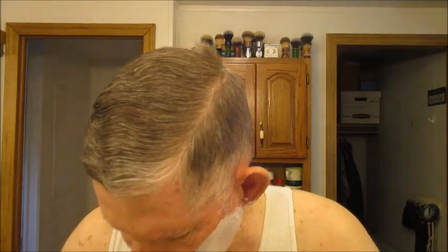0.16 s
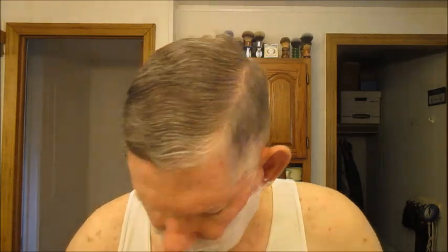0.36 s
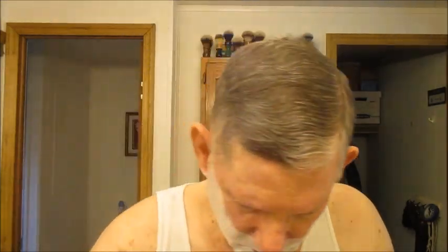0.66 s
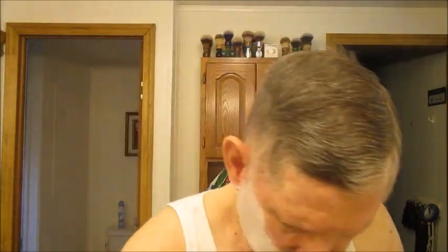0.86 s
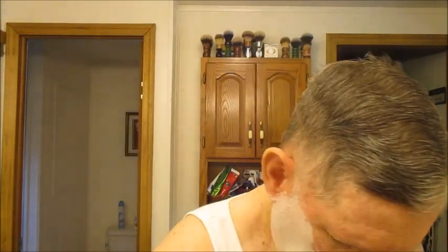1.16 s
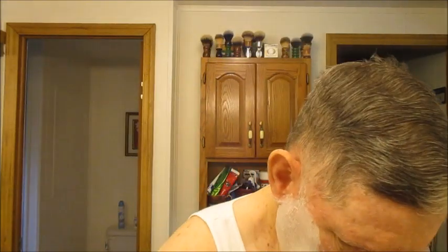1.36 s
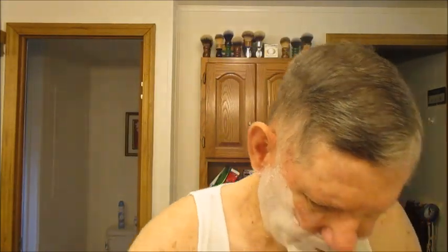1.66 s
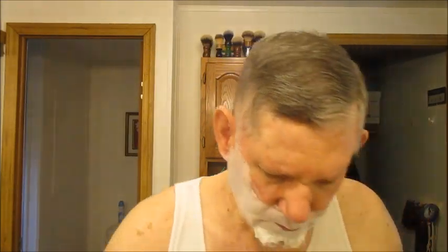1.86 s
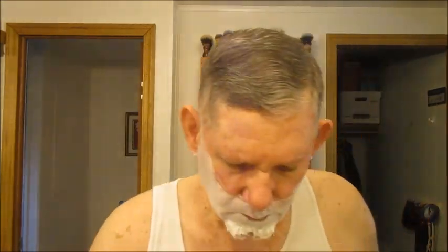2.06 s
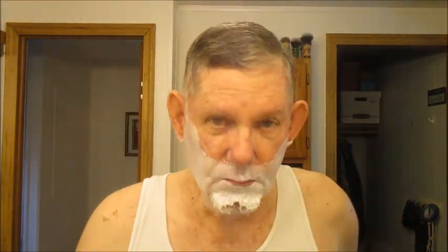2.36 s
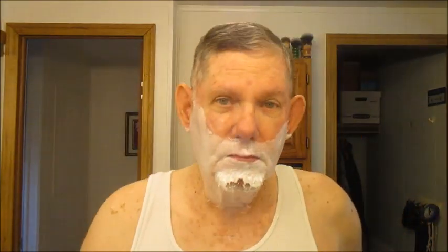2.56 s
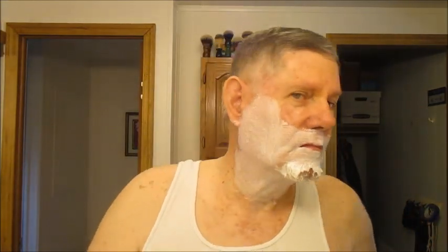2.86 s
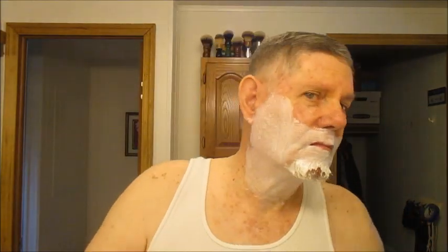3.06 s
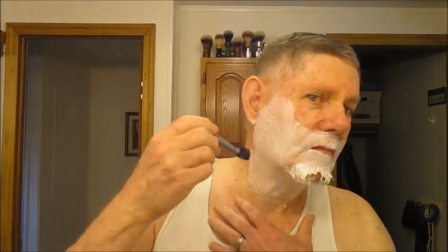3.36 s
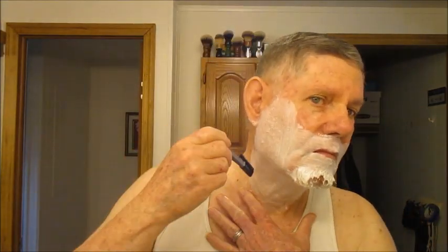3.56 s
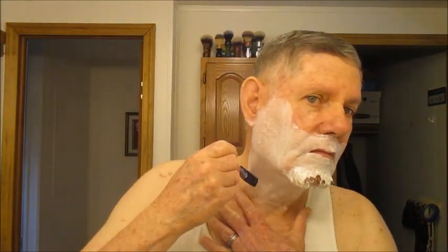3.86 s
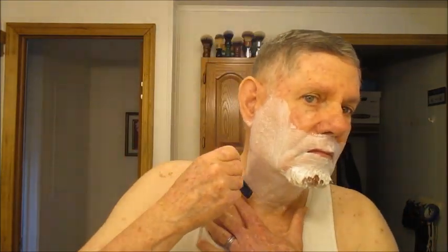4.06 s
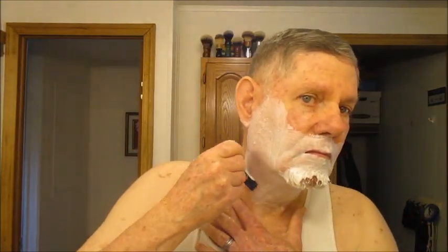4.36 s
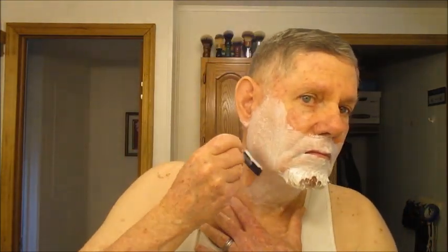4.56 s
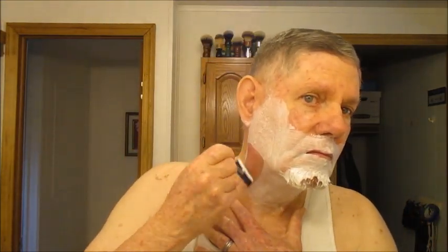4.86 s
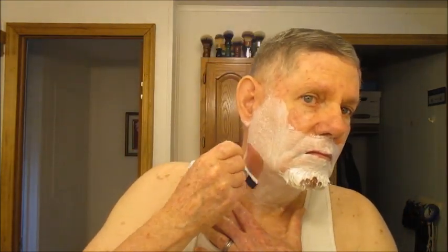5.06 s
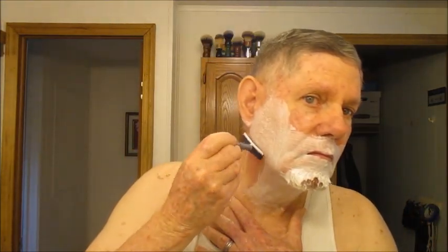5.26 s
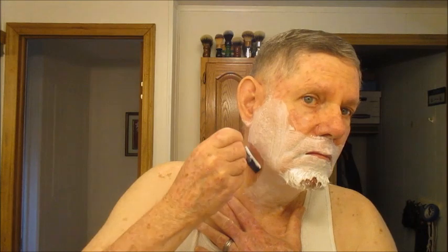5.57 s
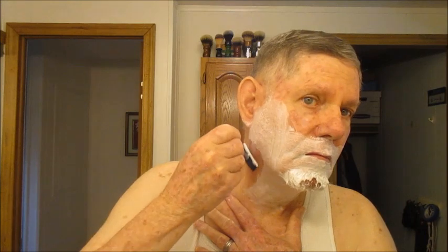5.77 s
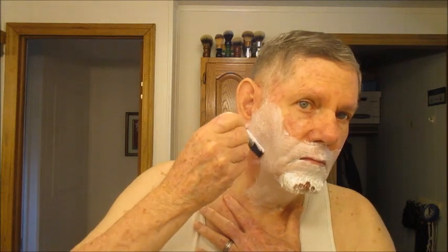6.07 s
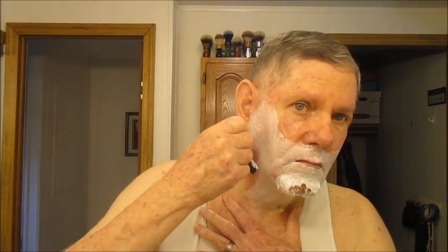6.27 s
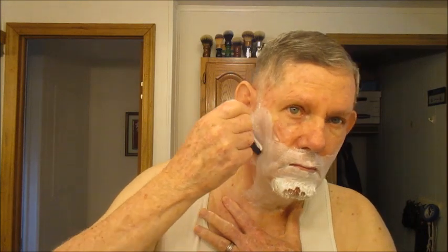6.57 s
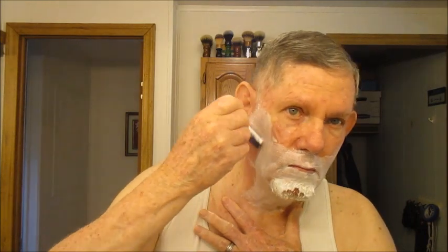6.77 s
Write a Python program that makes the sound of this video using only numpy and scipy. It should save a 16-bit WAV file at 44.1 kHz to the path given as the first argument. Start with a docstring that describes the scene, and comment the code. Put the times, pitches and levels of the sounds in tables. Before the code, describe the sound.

A razor is rinsed and used near the microphone, with short bathroom echoes. Faint fabric rubbing and muffled bumps come first, then a single hollow basin knock and a cluster of quick rising water blips. A late plop and spray, more bumps and cloth follow. A low, rough palm rub precedes a catchy light touch and five separate thin, bright scrapes of snapping hairs, over low fan rumble and steady hiss.

```python
"""Throughout, ventilation rumbles in a small bathroom over microphone hiss: shaped noise, one duct resonance.
First a hand brushes cloth (fine random clicks), dull touches sound (resonant noise) and drops spray (bright noise).
A razor is rinsed: it knocks once on the basin (decaying modes) and rattles; water plops and gurgles (rising sines).
More brushes, touches and drips; a palm slides on the chest (coarse, low clicks), once more amid the shaving.
Then a light first touch of the razor and five short shaving strokes: a crowd of hairs snaps at the blade."""
import sys
import numpy as np
from scipy import signal
from scipy.fft import rfft, irfft, next_fast_len
from scipy.io import wavfile
from scipy.ndimage import uniform_filter1d

SR = 44100
rng = np.random.default_rng(int(sys.argv[2]) if len(sys.argv) > 2 else 0)


def bounce(signal):
    """Save signal as a 16-bit WAV file at the path given by the first command-line argument."""
    frames = np.transpose(np.atleast_2d(signal))
    limited = np.clip(frames, -1, 1)
    pcm = np.round(limited * 32767).astype(np.int16)
    wavfile.write(sys.argv[1], SR, pcm)


N = 304290


def from_db(db):
    """Decibels to gain."""
    return 10 ** (np.asarray(db) / 20)


def rms_one(x):
    """Scale to rms 1."""
    return x / np.sqrt(np.mean(x ** 2) + 1e-20)


def in_time(points):
    """Points of (t/s, value) joined by straight lines, sample by sample."""
    t_s, value = np.transpose(points)
    return np.interp(np.arange(N) / SR, t_s, value)


def drift(rate_hz):
    """Slow chance: noise twice through a one-pole low-pass, rms 1."""
    r = np.exp(-2 * np.pi * rate_hz / SR)
    noise = rng.standard_normal(N + SR)
    return rms_one(signal.lfilter([1], [1, -2 * r, r * r], noise)[SR:])   # first second: settling


def coloured(x, spectrum):
    """Shape x by a relative spectrum of (f/Hz, density/dB per Hz); rms 1."""
    f_hz, density_db = np.transpose(spectrum)
    grid_hz = np.maximum(np.arange(N // 2 + 1) * SR / N, 1)
    gain = from_db(np.interp(np.log(grid_hz), np.log(f_hz), density_db))
    return rms_one(irfft(rfft(x) * gain, N))


def resonate(x, peaks):
    """Parallel two-pole resonances of (f/Hz, width/Hz, gain/dB), signs alternating."""
    out = 0
    for k, (f_hz, width_hz, gain_db) in enumerate(peaks):
        r = np.exp(-np.pi * width_hz / SR)
        b = (1 - r * r) / 2 * np.array([1, 0, -1])
        a = [1, -2 * r * np.cos(2 * np.pi * f_hz / SR), r * r]
        out = out + (-1) ** k * from_db(gain_db) * signal.lfilter(b, a, x)
    return out


def grains(per_s, spread_db):
    """Random clicks of exponentially spread dB size and random sign."""
    sizes = from_db(spread_db * np.minimum(rng.exponential(1, N), 5)) * rng.choice([-1, 1], N)
    return sizes * (rng.random(N) < per_s / SR) + 1e-18


def add(out, t_s, sound):
    """Mix a sound in at time t_s."""
    i = round(t_s * SR)
    out[i:i + len(sound)] += sound[:N - i]


def puff(t60_s):
    """White noise that swells within milliseconds and dies away."""
    t = np.arange(SR // 5) / SR
    return rng.standard_normal(len(t)) * np.tanh(t / 0.0016) * from_db(-60 * t / t60_s)


def background():
    """Unevenly swelling low noise of ventilation with one duct resonance, over nearly steady hiss."""
    # uneven chance swells of the low rumble: t/s, level/dB
    rumble_swells = [(0.0, -51.5), (0.59, -49), (2.67, -52), (3.84, -47), (3.9, -51), (4.26, -45),
                     (4.28, -51), (4.98, -46), (5.86, -52.5), (6.42, -48.5), (6.9, -51)]
    # ventilation spectrum: f/Hz, density/dB per Hz
    rumble_colour = [(15, -28), (25, -8), (38, -1.5), (52, -7.5), (66, 3.5), (80, -4), (95, -1), (120, -5),
                     (160, -12.5), (220, -23), (300, -56)]
    # microphone hiss spectrum: f/Hz, density/dB per Hz
    hiss_colour = [(88, -13.5), (150, -0.5), (209, -11.5), (263, -3.5), (320, -12.5), (388, -12),
                   (4140, -28.5), (6860, -29.5), (12000, -35), (15500, -48)]
    waver_db, duct_db, hiss_db = 0.76, -69, -58
    duct_hz, duct_width_hz = 259.6, 13

    rumble_gain = from_db(in_time(rumble_swells) + waver_db * drift(1.8))
    rumble = coloured(rng.standard_normal(N), rumble_colour) * rumble_gain
    duct = rms_one(resonate(rng.standard_normal(N), [(duct_hz, duct_width_hz, 0)]))
    hiss = coloured(rng.standard_normal(N), hiss_colour) * from_db(hiss_db + .4 * drift(6))
    return rumble + from_db(duct_db) * duct + hiss


def rub(rows, onset_s, fade_s):
    """Gain of rubbing gestures: straight in dB, with 20 dB rise per onset_s and 20 dB fall per fade_s."""
    gain = 0
    for start, stop, start_db, stop_db in rows:
        before = (start - 4 * onset_s, start_db - 80)
        after = (stop + 4 * fade_s, stop_db - 80)
        gain = gain + from_db(in_time([before, (start, start_db), (stop, stop_db), after]))
    return gain


def hand():
    """Friction is a crowd of tiny slips: fine and broad on cloth, coarse and low on skin."""
    # cloth brushed: start/s, stop/s, start level/dB, stop level/dB
    cloth_rubs = [(.15, .25, -70, -68), (.28, .31, -67, -61), (.465, .56, -62.5, -68),
                  (2.38, 2.45, -66, -65), (2.48, 2.6, -61, -62.5), (2.645, 2.83, -54, -51)]
    # cloth friction spectrum: f/Hz, density/dB per Hz
    cloth_colour = [(150, -25), (250, 3), (372, -6), (466, -1.5), (544, -5), (995, 1.5), (1950, -6.5),
                    (8320, -14.5), (15500, -29.5)]
    # palm sliding on the chest: start/s, stop/s, start level/dB, stop level/dB
    skin_rubs = [(3.513, 3.59, -41, -43), (3.69, 3.715, -44, -49), (3.73, 3.84, -52, -53.5),
                 (4.76, 4.94, -61.5, -54.5)]
    # skin friction spectrum: f/Hz, density/dB per Hz
    skin_colour = [(60, -30), (120, -4.5), (240, 5.5), (520, -7.5), (900, -14.5), (2000, -30.5),
                   (4000, -53)]

    cloth_gain = rub(cloth_rubs, onset_s=0.056, fade_s=0.066) * from_db(0.5 * drift(17))
    cloth = coloured(grains(6000, 0.82), cloth_colour) * cloth_gain
    skin_gain = rub(skin_rubs, onset_s=0.01, fade_s=0.056) * from_db(drift(42))
    skin = coloured(grains(3000, 1.6), skin_colour) * skin_gain
    return cloth + skin


def touches():
    """A soft contact is a click and a brief noise in one broad resonance."""
    # dull touches of hand and things on the counter: t/s, relative level/dB, f/Hz, t60/s
    contacts = [(0.277, -38, 354, 0.078), (0.29, -42.5, 730, 0.072), (0.462, -32, 280, 0.023),
                (0.865, -38, 1220, 0.035), (2.133, -38.5, 403, 0.049), (2.341, -36.5, 250, 0.046),
                (2.372, -40.5, 690, 0.058), (2.384, -32, 255, 0.044), (2.407, -41, 700, 0.098),
                (2.741, -37, 316, 0.066), (2.819, -34.5, 970, 0.053), (3.034, -33, 291, 0.049),
                (3.513, -47, 554, 0.055)]
    out = np.zeros(N)
    for t_s, level_db, f_hz, t60_s in contacts:
        contact = puff(t60_s)
        contact[0] = 2.5   # the click
        body = resonate(contact, [(f_hz, 0.5 * f_hz, level_db + 11)])
        add(out, t_s, resonate(body, [(f_hz, 2.4 * f_hz, 0)]))
    return out


def water():
    """A pocket of air rings as a sine that rises while it shrinks; the surface splashes and sprays."""
    # air pockets: t/s, relative level/dB, f/Hz, rise/octaves per life, life/ms, splash re level/dB
    bubbles = [(1.347, -44, 950, 0.13, 1.6, -6.5), (1.379, -50.5, 1030, 0.23, 6.3, -8),
               (1.409, -42.5, 2230, 0.34, 2.5, -13), (1.414, -45.5, 3100, 0.027, 6.9, -4),
               (1.456, -46.5, 3250, .03, 3.5, -6), (1.493, -42, 2500, .13, 3.9, -24),
               (1.496, -22, 1488, 0.075, 5.3, -40), (1.499, -39.5, 2880, .05, 5.3, -25),
               (1.500, -21, 1600, 0.13, 2.24, -40), (1.507, -42, 3230, 0.039, 4.7, -21),
               (1.511, -35, 1710, 0.05, 3, -30), (1.521, -28, 1596, 0.087, 4.4, -23),
               (1.523, -37.5, 3340, .06, 3.6, -20), (1.613, -44, 1430, 0.11, 2.1, -14),
               (1.663, -44, 3160, .02, 4.1, -18), (1.683, -29.5, 2370, .023, 2.9, -5.5),
               (1.683, -37, 3870, 0.018, 7.5, -12), (1.745, -28.5, 1590, 0.023, 5.3, -16),
               (1.748, -38.5, 3550, .024, 3.7, 0), (2.209, -27.5, 2347, .13, 3.4, -13.5)]
    # gurgle, first and last pocket: t/s, relative level/dB, f/Hz, rise/octaves per life, life/ms,
    # splash re level/dB
    gurgle = [(1.444, -48, 830, 0.076, 14, -3), (1.483, -40, 1410, 0.089, 3, -32)]
    # bright spray of a drop: t/s, relative level/dB, f/Hz, t60/s
    drops = [(0.392, -45, 9500, .06), (1.45, -54, 8000, .03), (1.663, -35.5, 9000, 0.057),
             (2.239, -36, 9600, 0.082), (2.256, -32, 6540, 0.061)]

    tones, splash, spray = np.zeros((3, N))
    pockets = [*bubbles, *np.linspace(*gurgle, num=4)]
    for t_s, level_db, f_hz, rise_oct, life_ms, splash_db in pockets:
        age = np.arange(SR // 10) / SR / (life_ms / 1000)   # in lives
        pitch_hz = f_hz * 2 ** (rise_oct * (np.minimum(age, 3) - .6))
        # the pocket shivers
        wobble = uniform_filter1d(rng.standard_normal(len(age)), size=60) * np.sqrt(60)
        pitch_hz = pitch_hz * (1 + 0.033 * wobble)
        envelope = np.tanh(2.9 * age) * np.exp(-age ** 1.2)
        tone = np.sin(2 * np.pi * np.cumsum(pitch_hz) / SR)
        add(tones, t_s, from_db(level_db + 4) * tone * envelope)
        add(splash, t_s, from_db(level_db + splash_db) * puff(0.052))
        # smaller pockets nearby
        add(tones, t_s, resonate(puff(0.11), [(f_hz, 0.21 * f_hz, level_db - 4.5)]))
    for t_s, level_db, f_hz, t60_s in drops:
        add(spray, t_s, resonate(puff(t60_s), [(f_hz, 3500, level_db - 8.0)]))
    splash = resonate(splash, [(2980, 1040, 13.2), (5230, 5800, 0.5)])
    splash = resonate(splash, [(4400, 17000, -3)])
    return tones + splash + spray


def knock():
    """Each mode of the basin rings after the blow, with a dull rattle; the razor then settles."""
    # razor on the basin: t/s, relative level/dB
    blows = [(1.183, -28)]
    # basin modes: f/Hz, relative level/dB, t60/s
    basin_modes = [(286.5, 1.5, 0.22), (500, -7, 0.073), (1165, -4, 0.053), (1440, -18, 0.05),
                   (2370, -9, 0.051), (2650, -10.5, 0.063), (2850, -19, .05), (3700, -19, .05),
                   (4590, -3, 0.025), (5170, -17, .04)]
    # the razor settles: t/s, relative level/dB
    settling = [(1.1948, -49), (1.2174, -45), (1.2374, -38.5)]

    out, t = np.zeros(N), np.arange(SR // 2) / SR
    for t_s, level_db in blows:
        for f_hz, mode_db, t60_s in basin_modes:
            decay = from_db(level_db + mode_db - 8.5 - 60 * t / t60_s)
            add(out, t_s, decay * np.sin(2 * np.pi * f_hz * t))
        rattle = resonate(puff(0.064), [(1090, 1200, 6.5), (3500, 3700, 1.5)])
        add(out, t_s, resonate(rattle, [(2500, 5500, level_db - 5.5)]))
    for t_s, level_db in settling:
        add(out, t_s, resonate(puff(0.031), [(2600, 1500, level_db)]))
    return out


def stroke_shape():
    """Gain of the hair snaps, and the dB of head, drag and crackle beside it."""
    # a light first touch of the razor, then five strokes: land/s, bite/s, lift/s, fade per 20 dB/ms,
    # snap drive gliding, biting, lifting/dB,
    # then re that drive: head/dB, crackle/dB, skin drag at landing/dB, at lifting/dB
    strokes = [(4.375, 4.418, 4.54, 22, -73, -71, -67.5, -9, -10, -23, -22),
               (4.574, 4.635, 4.758, 49, -60.5, -50.5, -55.5, -3, -9.5, -23, -13),
               (5.066, 5.202, 5.26, 66, -64, -63, -54.5, 3, -9.5, -10, -7),
               (5.543, 5.63, 5.74, 27, -67, -60.5, -56.5, 2.5, -8, -6, -3),
               (5.93, 6.04, 6.102, 47, -64.5, -57.5, -53, 4, -6, -8.5, 0.5),
               (6.352, 6.41, 6.68, 90, -67.5, -58, -58.5, 4.5, -6, -6.5, 4)]
    land_s, bite_s = 0.01, 0.0098   # rise per 20 dB before landing; step from glide to bite
    glide_rise_db = 3.5   # the glide swells until the edge bites
    head_grows_db, crackle_grows_db = 3, 1   # from landing to lifting, as the hand presses harder

    gain, colour = 0, []
    for land, bite, lift, fade_ms, glide_db, bite_db, lift_db, head_db, crackle_db, *drag_db in strokes:
        start_db = glide_db - glide_rise_db
        level = [(land - 4 * land_s, start_db - 80), (land, start_db),
                 (bite - bite_s, glide_db), (bite, bite_db),
                 (lift, lift_db), (lift + .004 * fade_ms, lift_db - 80)]
        gain = gain + from_db(in_time(level))
        colour += [(land, head_db - head_grows_db, drag_db[0], crackle_db - crackle_grows_db),
                   (lift + fade_ms / 1000, head_db, drag_db[1], crackle_db)]
    t_s, *columns = np.transpose(colour)
    return gain, [in_time(np.transpose([t_s, column])) for column in columns]


def razor():
    """Hairs snap at the edge; the same snaps ring blade and head, drag the skin and crackle."""
    # blade catching a tuft: t/s, drive/dB
    snags = [(4.3735, -63), (4.3824, -59), (4.4164, -56), (4.4237, -55), (4.4364, -60), (4.4444, -64),
             (4.4674, -66), (4.4844, -64), (4.496, -44.5), (4.5114, -50), (4.5254, -54), (4.5364, -59),
             (4.5685, -61), (4.5958, -45), (4.632, -45), (4.6544, -45), (4.7024, -49), (5.1093, -59),
             (5.212, -51), (5.29, -47), (5.629, -50), (5.9373, -55), (6.036, -57), (6.056, -54),
             (6.42, -58), (6.6936, -50), (6.7296, -59), (6.75, -59.5)]
    # blade resonances: f/Hz, width/Hz, gain/dB
    blade_peaks = [(6800, 1320, 7.5), (7810, 1800, 5)]
    # razor head resonances: f/Hz, width/Hz, gain/dB
    head_peaks = [(4550, 1360, -4), (6020, 590, -1.5)]
    # skin drag resonances: f/Hz, width/Hz, gain/dB
    drag_peaks = [(1480, 1060, 0), (2600, 950, 4.5), (3370, 780, 1.5)]
    # fine crackle resonances: f/Hz, width/Hz, gain/dB
    crackle_peaks = [(10800, 6400, 12.5), (11800, 8700, 6.5)]
    hairs_per_s, hair_spread_db = 6000, 2.5
    tufts_per_s, tuft_db = 120, -11   # smaller catches at random
    snag_t60_s, flutter_db = 0.034, 1.5

    gain, others = stroke_shape()
    # the blade's angle wavers, so each part answers unevenly
    head_db, drag_db, crackle_db = (db + flutter_db * drift(23) for db in others)
    hairs = rms_one(grains(hairs_per_s, hair_spread_db)) * gain
    tufts = np.abs(grains(tufts_per_s, 2.8))
    decay = from_db(-60 / (snag_t60_s * SR))   # per sample
    hairs = hairs * (1 + from_db(tuft_db) * signal.lfilter([1], [1, -decay], tufts))
    for t_s, drive_db in snags:
        add(hairs, t_s, from_db(drive_db) * puff(snag_t60_s))

    ring = resonate(resonate(hairs, blade_peaks), [(7880, 1760, 6.9)])
    head = resonate(resonate(hairs * from_db(head_db), head_peaks), [(5430, 10000, 10.8)])
    drag = resonate(resonate(hairs * from_db(drag_db), drag_peaks), [(2850, 7700, 8.6)])
    crackle = resonate(resonate(hairs * from_db(crackle_db), crackle_peaks), [(12400, 12000, 2.0)])
    return ring + head + drag + crackle


def bathroom(x):
    """Echoes go round between hard walls in eight parallel loops, duller each time."""
    t60_s, wall_cut_hz = 0.27, 4500   # t60 of the lowest frequencies
    size = next_fast_len(N + SR)
    turn = np.exp(-2j * np.pi * np.arange(size // 2 + 1) / size)   # one sample of delay
    dull = np.exp(-2 * np.pi * wall_cut_hz / SR)
    wall = (1 - dull) / (1 - dull * turn)
    response = 0
    for k, lag in enumerate([311, 467, 593, 701, 823, 967, 1109, 1283]):   # samples
        loop = from_db(-60 * lag / SR / t60_s) * wall * turn ** lag
        response = response + (-1) ** k * loop / (1 - loop)
    return irfft(rfft(x, size) * response, size)[:N]


def scene():
    """Near sounds with their echoes, over the background."""
    # basin echoes off the nearest walls: delay/ms, gain/dB
    basin_echoes = [(12.5, -15), (25, -26)]
    basin_room_db, counter_room_db, razor_room_db = -13.5, -15, -17   # sends to the room

    basin, counter, shave = water() + knock(), touches(), razor()
    near = np.zeros(N)
    for delay_ms, gain_db in basin_echoes:
        add(near, delay_ms / 1000, from_db(gain_db) * basin)
    send = from_db(basin_room_db) * basin + from_db(counter_room_db) * counter
    echoes = bathroom(send + from_db(razor_room_db) * shave)
    return (basin + near + counter + shave + echoes + hand() + background())[None]


def record(dry):
    """A steep elliptic low-pass cuts the top."""
    cutoff_hz = 15780
    return signal.sosfilt(signal.ellip(14, .5, 60, cutoff_hz, fs=SR, output="sos"), dry)


dry = scene()
out = record(dry)
bounce(out)
```